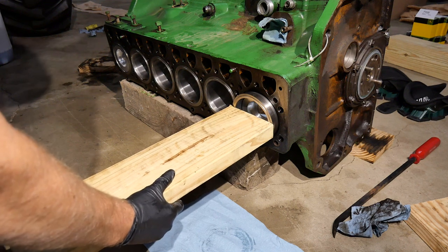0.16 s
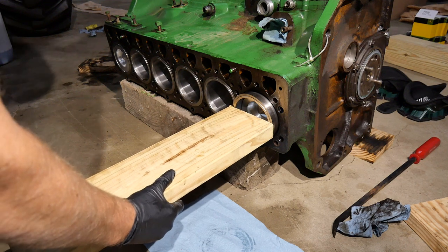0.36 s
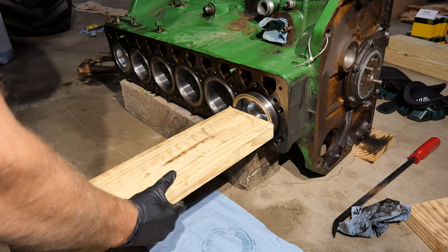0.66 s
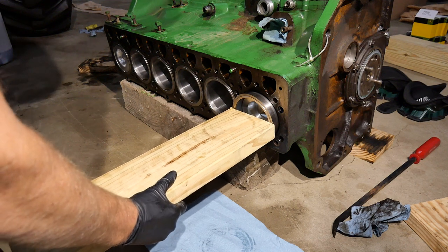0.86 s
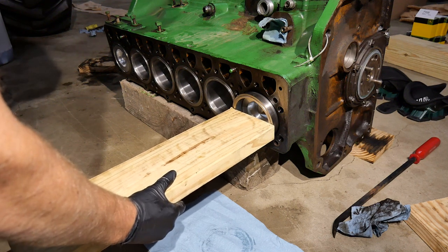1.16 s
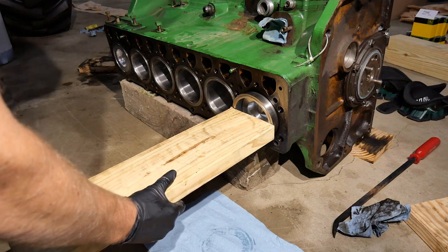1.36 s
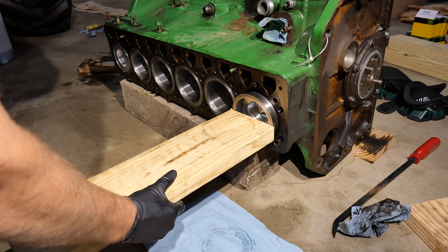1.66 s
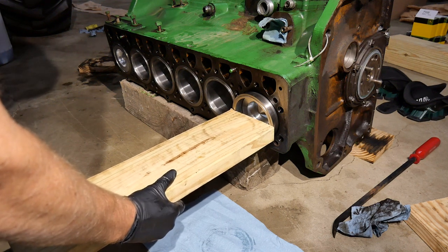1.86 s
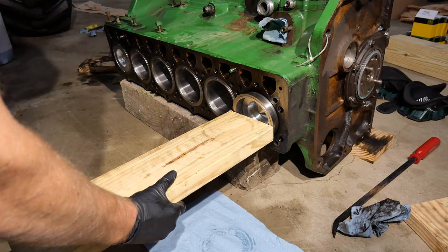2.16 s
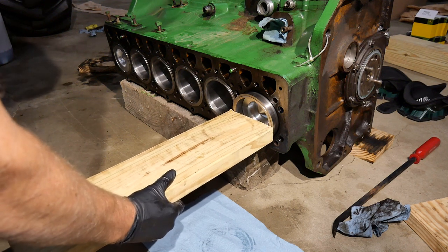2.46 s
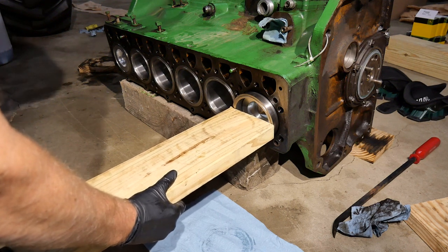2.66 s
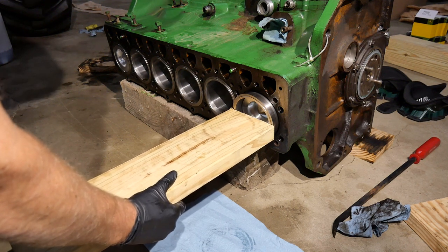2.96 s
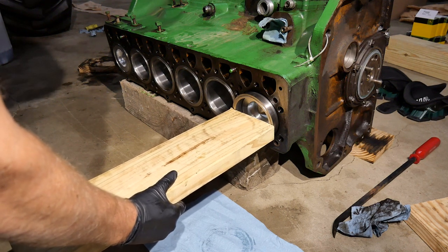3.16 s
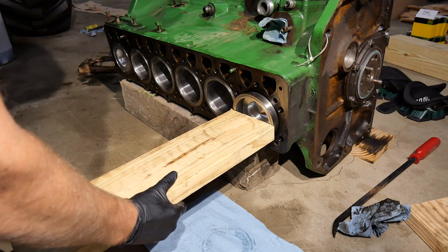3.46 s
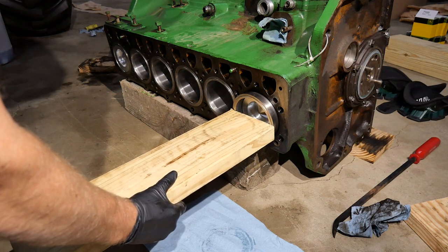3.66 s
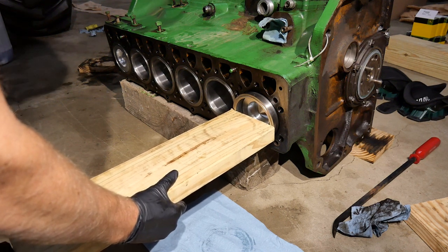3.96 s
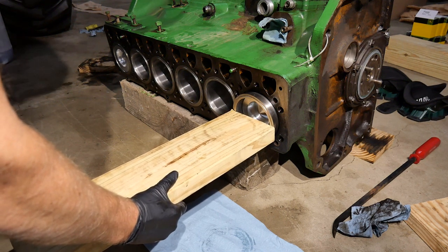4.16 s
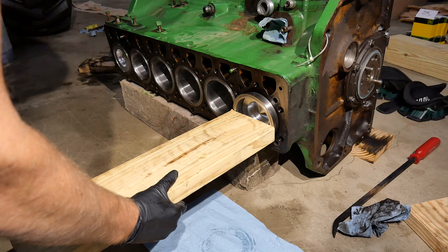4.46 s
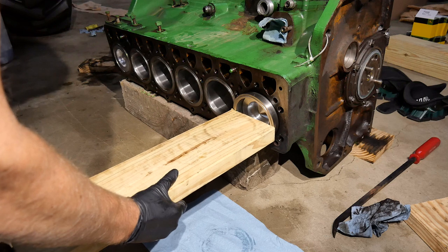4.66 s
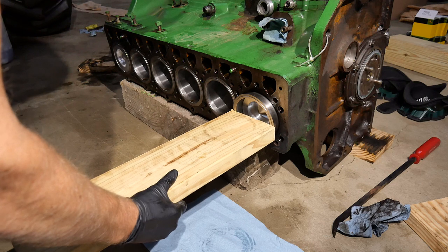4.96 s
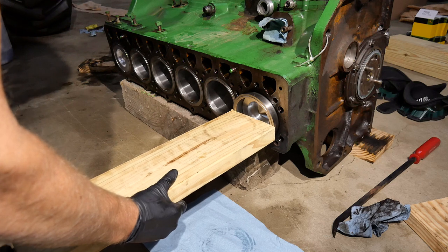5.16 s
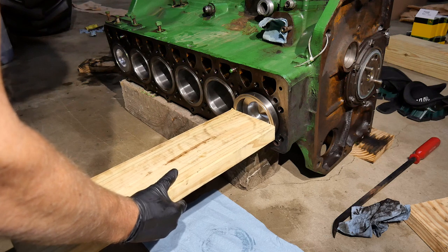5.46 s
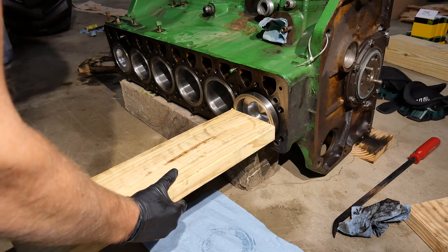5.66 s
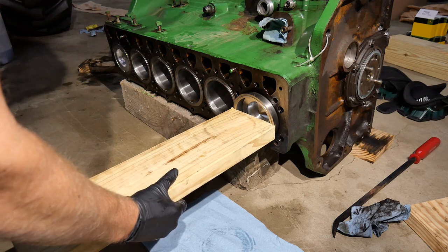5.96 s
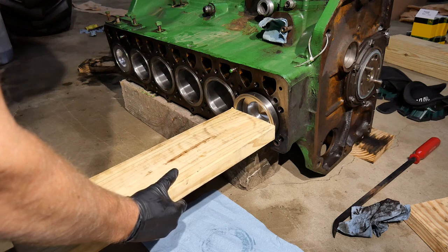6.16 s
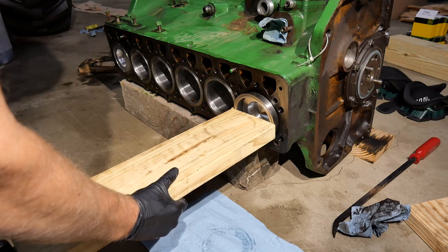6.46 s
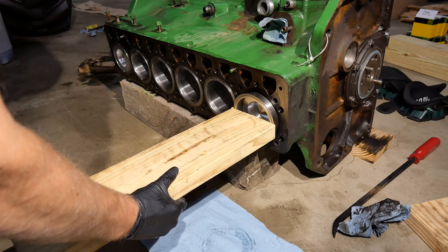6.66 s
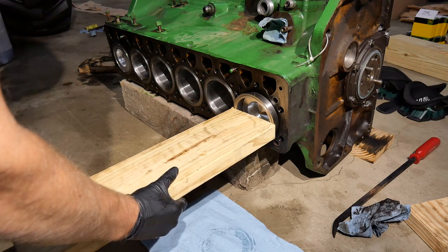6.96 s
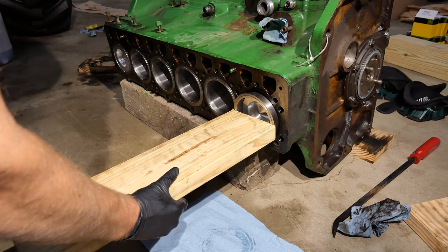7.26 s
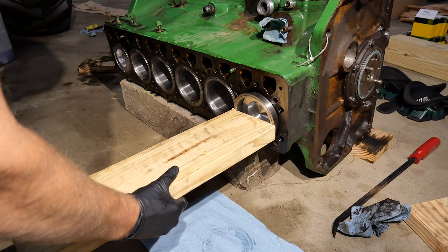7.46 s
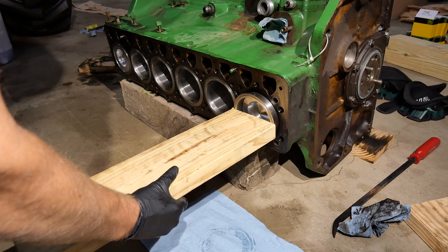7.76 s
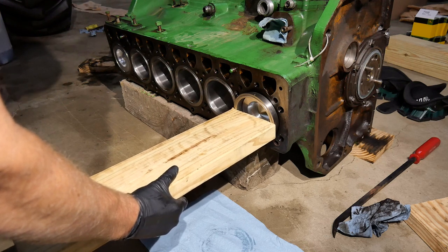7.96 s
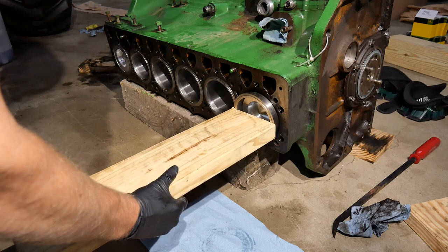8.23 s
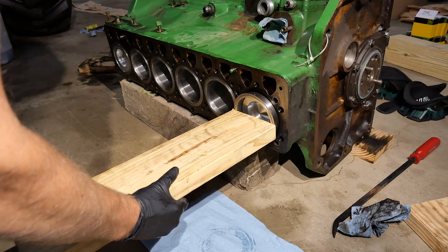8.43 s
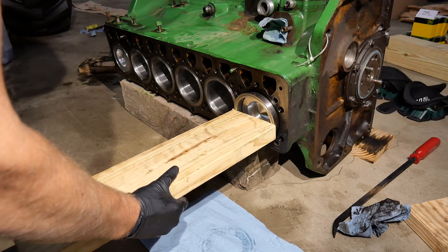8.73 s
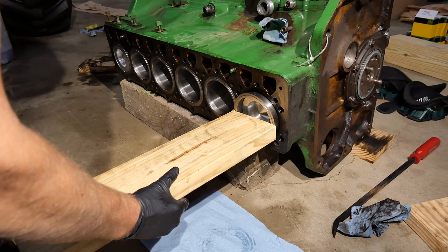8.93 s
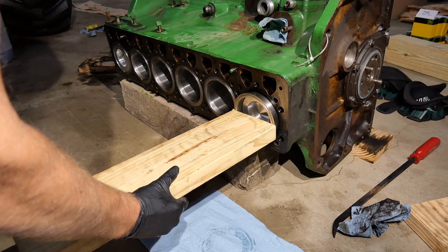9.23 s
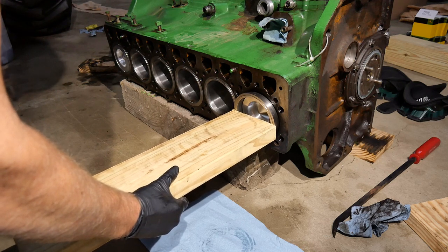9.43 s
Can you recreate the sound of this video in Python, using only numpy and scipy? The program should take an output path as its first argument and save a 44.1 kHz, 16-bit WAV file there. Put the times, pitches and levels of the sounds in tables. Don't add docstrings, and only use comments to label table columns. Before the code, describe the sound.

Close, loud wood-and-metal knocks about every six tenths of a second, slightly overloaded, each leaving a brief metallic ring and room echo.

```python
import sys
import numpy as np
from scipy import signal
from scipy.fft import next_fast_len
from scipy.io import wavfile
from scipy.ndimage import uniform_filter1d

SR = 44100
rng = np.random.default_rng(int(sys.argv[2]) if len(sys.argv) > 2 else 0)


def generate_wav(sig):
    pcm = np.round(np.clip(np.atleast_2d(sig).T, -1, 1) * 32767).astype(np.int16)
    wavfile.write(sys.argv[1], SR, pcm)


def ratio(d):
    e = np.asarray(d, float) / 20
    return 10 ** e


N = 422919

# frequency [Hz], level [dB per Hz].
AIR = [(25, -38), (60, -31), (110, -15), (180, -15), (280, -3), (490, -5), (900, -7), (2400, -11),
       (5000, -20.5), (8000, -28), (10000, -27.5), (14400, -40), (16000, -50)]
# time [s], air level [dB].
AIR_LEVEL = [(0, -34.5), (1.5, -38), (3.45, -41), (4.1, -44), (5.3, -47), (9.59, -46.5)]
# frequency [Hz], likeness [0 to 1].
LIKENESS = [(60, 0.083), (130, 0.32), (290, 0.88), (640, 0.81), (1400, 0.71), (3100, 0.84), (6800, 0.86),
            (15000, 0.88)]
# start [s], knock peak [dB], knock pitch [Hz], board pitch [Hz],
# board level against the knock [dB].
BLOWS = [(0.27, -4.5, 1104, 610, 7), (0.9188, 10.5, 1555, 1025, -4), (1.5261, -2.5, 1100, 614, 10.5),
         (2.1594, 8, 1356, 606, -8), (2.7716, 4.5, 1090, 1180, 0.5), (3.476, 7, 1314, 1050, -14),
         (4.0948, 8.5, 1390, 937, -1), (4.701, 11.5, 1366, 794, -16.5), (5.307, 7.5, 1434, 463, -13),
         (5.9348, 0.5, 1390, 770, 2), (6.55, 10, 1420, 604, -16), (7.169, 7, 1430, 503, -7),
         (7.784, 10.5, 1543, 980, -15), (8.3931, 9, 1330, 1050, -21.5), (9.0071, 6, 1507, 1130, -6.5)]
# block ring [dB], sleeve peak [dB], loudest sleeve mode [Hz], longest
# jingle mode [Hz], crack against the sleeve [dB].
CLANGS = [(-22, -17, 2650, 3700, -34), (-4, -2.5, 2730, 4100, -11.5), (-10.5, -3.5, 2280, 4100, -12.5),
          (-13.5, 1.5, 2040, 4600, -22), (-13.5, -1.5, 2510, 4640, -36), (-8.5, 2, 2500, 3500, -20.5),
          (-3.5, 0.5, 1300, 4370, -18), (-17.5, -2.5, 2480, 3500, -26), (-13, 0, 2500, 3500, -15.5),
          (-12, 0.5, 2580, 4400, -26), (-7.5, 1, 3000, 4600, -27), (-10, -0.5, 2280, 4560, -16),
          (-12, 0, 2620, 3960, -20), (-10, 1, 2460, 4400, -20), (-9.5, 1.5, 2100, 3960, -20)]
# frequency [Hz], level [dB], t60 [s].
SLEEVE_MODES = [(1885, -31, .03), (2055, 1.5, 0.0096), (2250, 4, 0.021), (2606, -14.5, 0.046),
                (2487, -1, 0.026), (3020, -32, 0.015)]
# frequency [Hz], level [dB], t60 [s].
JINGLE_MODES = [(3480, -17, 0.014), (4013, -6, 0.015), (4460, -1, 0.007), (5365, -3, 0.014),
                (7000, -12, 0.0072)]
# delay [s], level [dB], left-right difference [dB].
ECHOES = [(.027, -15, 4), (.041, -42, -1), (.056, -19.5, 1.5), (.069, -27, -1.5), (.088, -30, -8),
          (.104, -43, -2.5), (.135, -38, -14), (.161, -30, -10), (.186, -28.5, -4), (.228, -36, -11),
          (.246, -49, -8)]
# frequency [Hz], level against the ring [dB], t60 [s].
LASTING_MODES = [(1425, -11, 0.95), (1443, -14, 1.4), (1496, -12, 1.2)]
# wood [dB], metal [dB], extra brightness [dB],
# lingering mode [Hz], its level [dB].
TAILS = [(-50, -66, -8, 560, -59), (-51, -58, 4.5, 585, -51), (-44, -52, -5.5, 585, -46),
         (-44.5, -54, 1.5, 3270, -50), (-45.5, -52, -0.5, 2590, -46.5), (-52, -49.5, 8, 2900, -45),
         (-52.5, -53.5, 2.5, 2740, -46), (-47.5, -54, 3, 2400, -51.5), (-50, -48.5, 3, 2177, -43.5),
         (-45.5, -51, -6.5, 2280, -48.5), (-47.5, -51, -3, 2270, -47.5), (-48, -48.5, -2, 3100, -67),
         (-46, -54, -1, 2700, -71), (-51, -51, 4.5, 2050, -48.5), (-50, -52.5, 4, 1800, -50)]
# centre [Hz], width [Hz].
TAIL_BANDS = [(280, 300), (750, 750), (2400, 1100), (4300, 1400)]
# frequency [Hz], width [Hz], level over the wash [dB].
TAIL_MODES = [(586, 18, 10.5), (1810, 27, 1.5), (2150, 37, 6.5), (2270, 51, 0), (2683, 74, 8.5),
              (3370, 120, 6), (3500, 270, 3.5), (3750, 140, -7), (3985, 87, 11.5), (4470, 100, 9),
              (4510, 170, 7.5), (5100, 94, -9), (5300, 100, 5), (6760, 90, 7)]
# frequency [Hz], level [dB].
TAIL_EDGES = [(60, -23), (140, -20), (230, 2.5), (4600, 7), (5000, 4.5), (6000, 1.5), (7300, -3),
              (9000, -3), (11000, -12), (15000, -32)]
# frequency [Hz], t60 [s].
ROOM_T60 = [(200, 0.75), (700, 0.44), (1500, 0.47), (3000, 0.84), (5000, 1), (9000, 0.7), (14000, 0.48)]
# start [s], peak [dB], board
# pitch [Hz], knock against the peak [dB], sleeve against the peak [dB].
BOUNCES = [
    (0.975, -34, 583.7, 10, -10),
    (4.154, -34, 587, -2, -3),
    (4.739, -20, 1020, -17.5, -3),
    (5.996, -13.5, 900, -1, -3.5),
    (6.606, -21, 583, 9, 1),
    (7.847, -13.5, 905, -1.5, -2.5),
    (8.449, -17.5, 945, -15, -8),
    (9.08, -30.5, 583, 10, 10),
]

RING_TAIL_DB, RING_TAIL_SLOPE = -29.5, 1.12


def read(points, hz):
    f, value = np.transpose(points)
    return np.interp(np.log(hz + 1), np.log(f + 1), value)


def add(mix, s, sound):
    part = mix[round(s * SR):][:len(sound)]
    part += sound[:len(part)]


def hump(hz, centre, width):
    return 1 / (1 + (2 * (hz - centre) / width) ** 2)


def ducking_db(t):
    clamp_s, recover_s = 0.035, 0.26
    onsets = np.transpose(BLOWS)[0]
    ring_db, clang_db = np.transpose(CLANGS)[:2]
    depth_db = 22.5 + 0.57 * ring_db + 0.2 * clang_db
    last = np.maximum(np.searchsorted(onsets, t) - 1, 0)
    since = t - onsets[last]
    shape = np.clip(since / clamp_s, 0, 1) * np.clip(1 - since / recover_s, 0, 1)
    return -np.maximum(depth_db[last], 0) * shape


def air_power(hz, t):
    air = ratio(2 * read(AIR, hz))
    air_db = np.interp(t, *np.transpose(AIR_LEVEL))
    return np.outer(air / (air.sum() * hz[1]), ratio(2 * air_db))


def struck(modes, peak_db, contact_s):
    spread_db, spread_pitch = 2, 0.006
    t = np.arange(4400) / SR
    chance = rng.standard_normal((len(modes), 2))
    ring = np.zeros(len(t))
    for (hz, db, t60), (louder, sharper) in zip(modes, chance):
        sine = np.sin(2 * np.pi * hz * (1 + spread_pitch * sharper) * t)
        ring += ratio(db + spread_db * louder - 60 * t / t60) * sine
    jolts = np.zeros(400)
    places = (rng.random(3) * contact_s * SR).astype(int) % 400
    jolts[places] = rng.uniform(0.11, 0.56, 3) * rng.choice([-1, 1], 3)
    jolts[0] = -1
    sound = np.convolve(ring, jolts)[:len(t)]
    return ratio(peak_db) * sound / abs(sound).max()


def burst(lo_hz, hi_hz, db, t60):
    band = signal.butter(2, [lo_hz, hi_hz], "band", fs=SR, output="sos")
    noise = signal.sosfilt(band, rng.standard_normal(4400))
    return noise / noise.std() * ratio(db - 60 * np.arange(4400) / SR / t60)


def wood(board_hz, board_db, knock_hz, knock_db):
    board = [(board_hz, 0, .02), (585, -8, .04), (0.86 * board_hz, -8, .012),
             (1.086 * board_hz, -5, .012), (300, -12, .015)]
    knock = [(knock_hz, 0, .012), (1.3 * knock_hz, -8, .01), (0.902 * knock_hz, -7, .012)]
    fibres = burst(770, 1780, max(board_db, knock_db) - 15, 0.028)
    return struck(board, board_db, 0.00152) + struck(knock, knock_db, .001) + fibres


def metal(sleeve_hz, sleeve_db, jingle_hz, jingle_db, crack_db):
    sleeve = struck([(sleeve_hz, 7, .02), *SLEEVE_MODES], sleeve_db + 3.5, .0022)
    sleeve += burst(2090, 3640, sleeve_db - 12.5, 0.036)
    jingle = struck([(jingle_hz, -5, .03), *JINGLE_MODES], jingle_db - 2, .0022)
    jingle += burst(4200, 7270, jingle_db - 9, 0.012)
    return sleeve + jingle + burst(3700, 10700, crack_db + 6, 0.0089)


def walls(x):
    taps = np.zeros((2, SR // 3))
    for delay, db, pan_db in ECHOES:
        taps[:, round(delay * SR)] = ratio([db + pan_db / 2, db - pan_db / 2])
    return signal.oaconvolve(x[None], taps, axes=1)[:, :N]


def soft_start():
    return np.minimum(np.arange(4400) / SR / 0.00091, 1)


def blows():
    lean_db, wood_delay_s, metal_lead_s = 0.8, 0.0006, 0.0004
    out = np.zeros((2, N))
    rise = soft_start()
    for (s, db, knock_hz, board_hz, board), (_, clang_db, sleeve_hz, jingle_hz, crack) in zip(BLOWS, CLANGS):
        jingle_db = clang_db - 2.5 + 0.3 * clang_db
        knock = wood(board_hz, db + board - 0.5, knock_hz, db - 1) * rise
        clang = metal(sleeve_hz, clang_db, jingle_hz, jingle_db, clang_db + crack) * rise
        for port, port_db in zip(out, (lean_db / 2, -lean_db / 2)):
            add(port, s + wood_delay_s, knock * ratio(port_db))
            add(port, s + wood_delay_s - metal_lead_s, clang * ratio(port_db))
    return out + ratio(-2.5) * walls(out.mean(axis=0))


def block():
    ring_hz, ring_t60_s, ring_lag_s = 1458, 0.1, 0.0007
    choke_s, choke_fall_s = 0.021, 0.005
    first, lasting = np.zeros((2, N))
    t = np.arange(int(.6 * SR)) / SR
    choke = np.clip((choke_s - t) / choke_fall_s, 0, 1) * np.minimum(t / 0.002, 1)
    hz, mode_db, t60 = np.transpose(LASTING_MODES)[:, :, None]
    for (s, *_), (first_db, *_) in zip(BLOWS, CLANGS):
        ring = ratio(first_db - 60 * t / ring_t60_s) * np.sin(2 * np.pi * ring_hz * t)
        add(first, s + ring_lag_s, ring * choke)
        late_db = RING_TAIL_DB + RING_TAIL_SLOPE * first_db - ducking_db(s + 0.27)
        sines = ratio(late_db + mode_db - 60 * (t - .2) / t60) * np.sin(2 * np.pi * hz * t)
        add(lasting, s, sines.sum(axis=0) * np.clip((t - .04) / 0.086, 0, 1))
    return first * ratio([[.6], [-.6]]) + ratio(8.5) * walls(first) + lasting * ratio([[1.5], [-1.5]])


def tail_colour(hz, clang, tail):
    first_db, _, sleeve_hz, jingle_hz, _ = clang
    boom, sleeve, shimmer_db, linger_hz, linger_db = tail
    board, jingle = boom - 6.5, sleeve - 8.5
    ring = RING_TAIL_DB + RING_TAIL_SLOPE * first_db
    centre, width = np.transpose(TAIL_BANDS)
    band_db = [boom, board, sleeve, jingle] - 10 * np.log10(width)
    wash_db = read(list(zip(centre, band_db)), hz) + shimmer_db * hump(hz, 4800, 2800)
    modes = 1 + sum((ratio(2 * db) - 1) * hump(hz, f, w) for f, w, db in TAIL_MODES)
    colour = ratio(2 * (wash_db + read(TAIL_EDGES, hz))) * modes
    colour += ratio(2 * (ring - 25.5)) * hump(hz, 1473, 40)
    colour += ratio(2 * (linger_db - 15)) * hump(hz, linger_hz, 88) ** 3
    colour += ratio(2 * (sleeve - 15)) * hump(hz, sleeve_hz, 45) ** 3
    colour += ratio(2 * (jingle - 8.5)) * hump(hz, jingle_hz, 49) ** 3
    return colour


def tail_power(hz, t):
    power = np.zeros((len(hz), len(t)))
    for (s, *_), clang, tail in zip(BLOWS, CLANGS, TAILS):
        since = np.maximum(t - s, 0)
        fading_db = -60 * (since - .2) / read(ROOM_T60, hz)[:, None] - ducking_db(s + 0.21)
        build_up = np.clip((since - .012) / 0.058, 0, 1)
        power += tail_colour(hz, clang, tail)[:, None] * ratio(2 * fading_db) * build_up
    return power


def diffuse():
    hz, t, z = signal.stft(rng.standard_normal((2, N)), SR, nperseg=1024, noverlap=768)
    power = air_power(hz, t) + tail_power(hz, t)
    patches = uniform_filter1d(rng.standard_normal(power.shape), 8, axis=0)
    patches = uniform_filter1d(patches, 8, axis=1)
    same = np.clip(read(LIKENESS, hz), 0, 1)[:, None]
    mid, side = np.sqrt((1 + same) / 2) * z[0], np.sqrt((1 - same) / 2) * z[1]
    pair = np.array([mid + side, mid - side]) * np.sqrt(power * SR / 2)
    pair = pair * ratio(8.3 * patches) * (hz < 15300)[:, None]
    return signal.istft(pair, SR, nperseg=1024, noverlap=768)[1][:, :N]


def bounces():
    out = np.zeros((2, N))
    rise = soft_start()
    for s, db, hz, knock, sleeve in BOUNCES:
        lift_db = db + 3 - ducking_db(s)
        tap = wood(hz, lift_db, 1350, lift_db + knock)
        tap += metal(2600, lift_db + sleeve - 6, 3850, lift_db - 22, lift_db - 35)
        for port in out:
            add(port, s, tap * rise)
    return out


def at_ports(hits):
    skew = signal.hilbert(hits.mean(axis=0), next_fast_len(N))[:N].imag * ratio(-12)
    skew = uniform_filter1d(skew, size=5)
    low_cut = signal.butter(2, 240, "high", fs=SR, output="sos")
    return signal.sosfilt(low_cut, hits + np.array([skew, -skew]))


def scene():
    return at_ports(blows() + bounces()) + block() + diffuse()


def top_cut(x):
    return signal.sosfilt(signal.butter(12, 16520, fs=SR, output="sos"), x)


def record(dry):
    ceiling = 0.93
    ducked = dry * ratio(ducking_db(np.arange(N) / SR))
    clipped = np.clip(ducked, -ceiling, ceiling)
    lean = signal.sosfilt(signal.butter(2, 60, "high", fs=SR, output="sos"), clipped)
    dipped = signal.lfilter(*signal.iirnotch(7880, 45, SR), lean)
    edge = signal.firwin(301, 16300, window=("kaiser", 9), fs=SR)
    mix = signal.oaconvolve(dipped, edge[None], "same")
    return top_cut(mix)


dry = scene()
out = record(dry)
generate_wav(out)
```